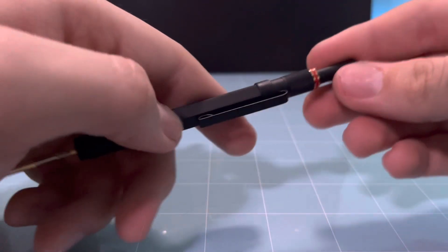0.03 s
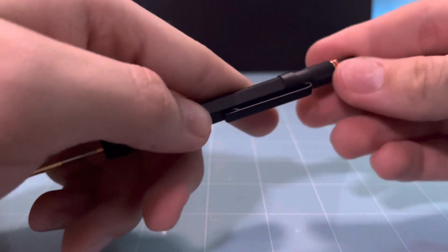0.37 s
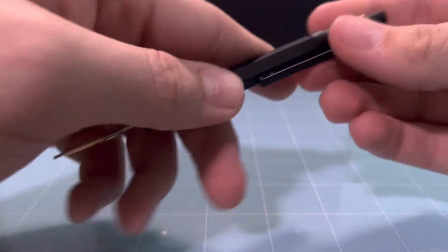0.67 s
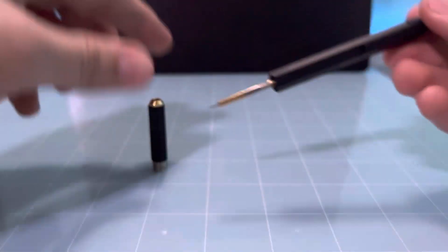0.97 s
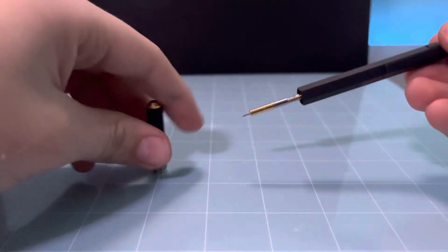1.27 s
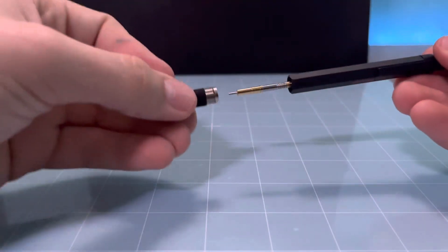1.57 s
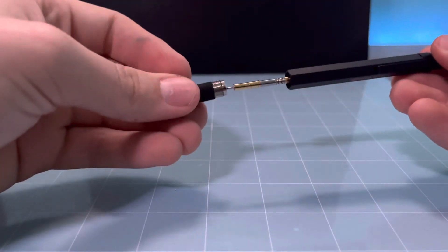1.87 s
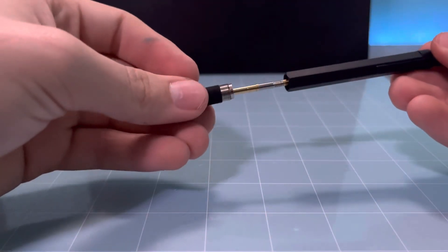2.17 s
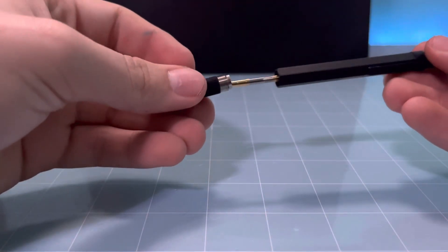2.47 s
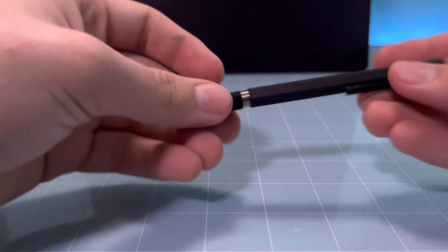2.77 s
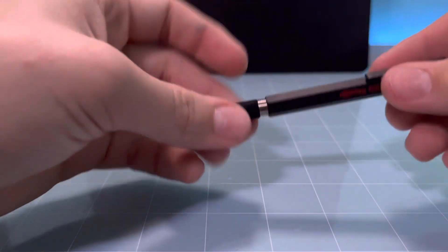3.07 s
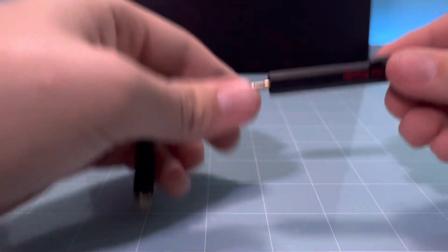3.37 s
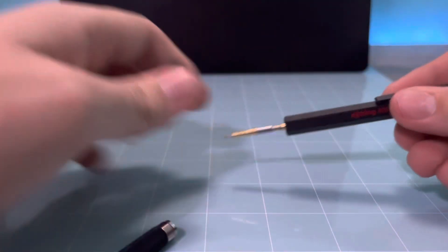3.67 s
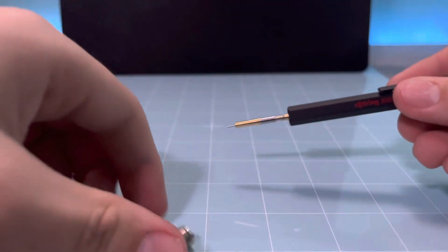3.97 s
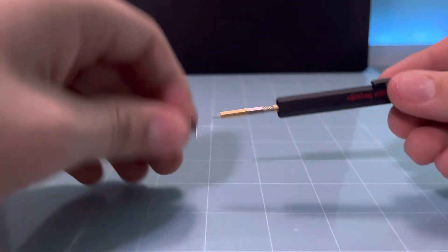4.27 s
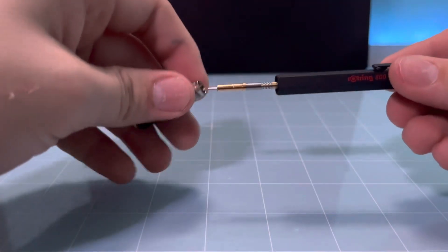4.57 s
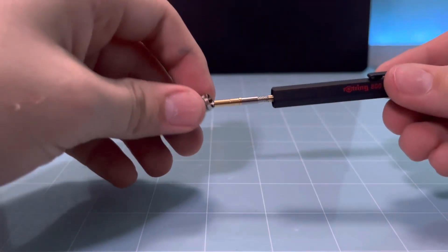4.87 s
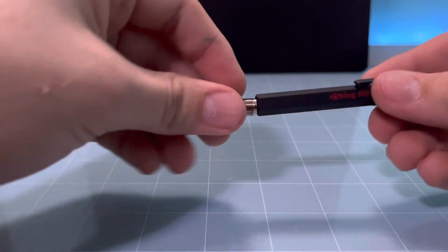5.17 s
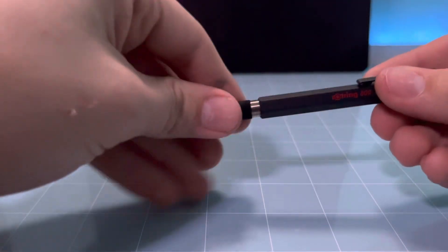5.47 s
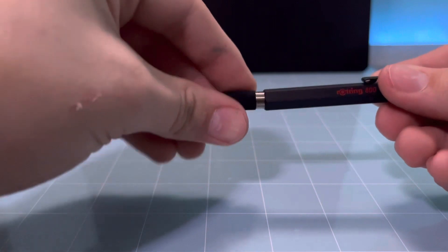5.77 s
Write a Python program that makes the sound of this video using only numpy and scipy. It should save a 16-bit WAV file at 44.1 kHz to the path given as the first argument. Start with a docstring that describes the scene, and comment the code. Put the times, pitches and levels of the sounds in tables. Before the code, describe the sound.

Light metallic clicks and short scrapes of a mechanical pencil being assembled, interrupted by its grip clattering onto a desk in a quiet room.

```python
"""At a desk in a small, quiet room, a metal mechanical pencil is fitted together by hand, close to a
small stereo microphone. Its parts tick as they touch, scrape as they slide or turn, and click home.
The grip slips off and bounces, making the desk ring, then is dragged off the desk mat and picked up.
Behind it all are a low hum, a deep rumble that comes and goes, and a soft band of hiss."""
import sys
import numpy as np
from scipy import signal
from scipy.fft import rfft, irfft, next_fast_len
from scipy.io import wavfile
from scipy.ndimage import uniform_filter1d

SR = 44100
rng = np.random.default_rng(int(sys.argv[2]) if len(sys.argv) > 2 else 0)


def to_wav(sig):
    """Store sig (one row per channel, or 1-D mono) as 16-bit WAV at the path in sys.argv[1].

    Samples outside -1..1 are clipped; the rate is SR.
    """
    pcm = np.clip(np.atleast_2d(sig), -1, 1) * 32767
    pcm = np.round(pcm).astype(np.int16)
    wavfile.write(sys.argv[1], SR, pcm.T)  # frames by channels


N = 257103
TIME = np.arange(N) / SR
TAPS = 4096  # filter length in samples
HZ = np.fft.rfftfreq(TAPS, 1 / SR)  # a "colour" is one gain for each of these frequencies

# The tone of the pencil's hollow body. Each row: frequency in Hz, relative level in dB.
HOLLOW_BODY = [(40, -13.5), (80, -3.5), (160, -1.5), (350, -4.5), (620, 1.5), (1300, 0.5), (2200, -6.5),
               (4000, -26), (16000, -59.5)]
# The murmur of the desk when its mat is rubbed. Each row: frequency in Hz, relative level in dB.
DESK_MURMUR = [(30, -23), (65, 10.5), (160, -10), (260, 2.5), (380, -4), (480, -20), (630, 1), (850, -24),
               (1200, -23), (2500, -53), (16000, -80)]


def ticks(usual_db=-40.5, usual_body_db=-74, body_slope=0.16):
    """Loose parts tap. The hollow body grows only slowly with force, so light taps are duller."""
    # Each row: start in seconds, level in dB, bright edge in dB relative to that level, ring in Hz.
    taps = [(0.2803, -38.5, -9.5, 3573), (0.517, -59, -34, 3800), (0.531, -41, -25, 4240),
            (1.276, -59, -32, 5900), (2.0175, -47.5, -21, 5184), (2.2132, -54.5, -15.5, 3300),
            (2.4002, -41, -8, 4630), (2.5253, -48, -5.5, 3180), (2.5503, -39.5, -19, 4260),
            (2.6388, -36, -32.5, 4530), (3.1602, -43, -16.5, 3170), (3.243, -41.5, -10.5, 4400),
            (3.2604, -43.5, -6.5, 3710), (3.2733, -34.5, -13, 3800), (3.3388, -56, -13.5, 3676),
            (4.002, -56, -7, 6600), (4.553, -48, -28, 4047), (4.8075, -38.5, -19.5, 4860),
            (4.8462, -36.5, -19.5, 5150), (4.9504, -31, -11, 6380), (5.035, -39.5, -15, 4150),
            (5.0514, -43.5, -20.5, 4800), (5.0658, -32.5, -18.5, 4770), (5.147, -42, -10.5, 4710),
            (5.2753, -51, -28, 4100), (5.299, -53, -22, 4680)]
    out = np.zeros(N)
    for start, db, edge_db, ring_hz in taps:
        body_db = usual_body_db + body_slope * (db - usual_db)
        add(out, start, click(db, body_db - db, edge_db, ring_hz, ring_db=10))
    return out


def parts_pushed_home(thud_hz=105, thud_s=0.0139, knock_hz=560, knock_s=0.0014):
    """A part hits its stop: a click, a small knock, a soft thud in the hands and a ringing grip tube."""
    # Each row: start in seconds, then five levels in dB: click, hollow body relative to the click,
    # strength of the barrel's ring, thud, grip tube.
    pushes = [(0.2999, -33.5, -34, 32, -46.5, -90), (2.6134, -23.5, -29, -15, -68, -43),
              (2.6442, -24.5, -41, 0, -66, -37.5), (5.137, -30, -34.5, -7.5, -44.5, -56.5),
              (5.4272, -40, -27, 0, -63, -64), (5.4521, -32, -21.5, 11, -44.5, -87),
              (5.8045, -41, -9, 5, -72, -80)]
    # The grip tube's notes. Each row: pitch in Hz, level in dB, seconds to fade by 60 dB.
    grip_notes = [(2155, 0.5, 0.015), (3230, -4.5, 0.046), (4700, -9, 0.073), (4900, -12, 0.12),
                  (6040, 13, 0.01), (8650, -10.5, .02), (12190, 4, 0.019), (12600, 0.5, .025)]
    out, t = np.zeros(N), TIME[:SR // 2]
    thud = np.sin(2 * np.pi * thud_hz * t) * np.exp(-t / thud_s)
    knock = amp(-2) * np.sin(2 * np.pi * knock_hz * t) * np.exp(-t / knock_s)
    for start, click_db, body_db, ring_db, thud_db, tube_db in pushes:
        tube = sum(amp(db - 60 * t / fade_s) * np.sin(2 * np.pi * hz * rng.normal(1, 0.0051) * t)
                   for hz, db, fade_s in grip_notes)
        add(out, start, click(click_db, body_db, edge_db=-19.5, ring_hz=4330, ring_db=ring_db))
        add(out, start, amp(thud_db) * (thud + knock) + amp(tube_db) * tube)
    return out


def slides():
    """The grip scrapes over the inner tube, louder or softer as the two close or part."""
    # Each row: start and end in seconds, level in dB, swell in dB per second,
    # bright edge in relative dB, ring in Hz.
    scrapes = [(0.262, 0.30, -78, -150, 7, 3500), (2.515, 2.538, -70.5, 1.5, -10.5, 3200),
               (2.555, 2.622, -59, -24.5, -11.5, 7200), (3.165, 3.283, -62, 50, -1, 3600),
               (4.958, 5.071, -57.5, -130, -0.5, 7000)]
    out = np.zeros(N)
    for start, end, db, swell, edge_db, ring_hz in scrapes:
        tube = metal(ring_hz, body_db=-29, edge_db=edge_db, ring_db=5, ring_octaves=0.46)
        colour = np.hypot(tube, whistle(-21.5))
        add(out, *stroke(start, end, db, colour, catch_db=2, swell_db_per_s=swell))
    return out


def turns():
    """The screw thread grinds as the grip is turned, and the hollow body sounds with it."""
    # Each row: start and end in seconds, level in dB, the thread's whistle in relative dB.
    twists = [(3.033, 3.149, -66.5, -6), (5.258, 5.307, -73, -26), (5.409, 5.447, -72.5, -12.5),
              (5.619, 5.645, -69, -14), (5.66, 5.77, -90, -8)]
    out = np.zeros(N)
    tube = metal(ring_hz=3870, body_db=-1.5, edge_db=-6, ring_db=-4.5, ring_octaves=0.28)
    for start, end, db, whistle_db in twists:
        colour = np.hypot(tube, whistle(whistle_db))
        add(out, *stroke(start, end, db, colour, catch_db=5, grain_db=7.5))
    return out


def rubs():
    """Fingers rub the barrel softly and bring out one ringing pitch."""
    # Each row: start and end in seconds, level in dB, ring in Hz.
    finger_moves = [(0.404, 0.482, -84.5, 4450), (1.225, 1.288, -85, 5900), (1.377, 1.496, -76, 4300),
                    (2.204, 2.227, -68.5, 3430), (2.271, 2.29, -80, 3360), (4.41, 4.471, -82, 4360)]
    out = np.zeros(N)
    for start, end, db, ring_hz in finger_moves:
        colour = metal(ring_hz, body_db=-9, edge_db=-37, ring_db=6, ring_octaves=0.11)
        add(out, *stroke(start, end, db, colour, catch_db=2.2))
    return out


def bounces(rise_cycles=0.37, travel_s=.0006, scatter_db=2, detune=0.033, rattle_db=-8):
    """The dropped grip bounces: each landing thumps the desk, rattles briefly and ticks."""
    # Each row: start in seconds, thump in dB, hardness as treble gain in dB per octave, tick in dB.
    landings = [(3.404, -15, -0.5, -29), (3.4496, -21, -1.5, -33), (3.4780, -19.5, 3.5, -20),
                (3.4865, -18, -2, -25.5), (3.5433, -31, 5, -29), (3.5455, -22.5, 2, -26),
                (3.5938, -24.5, -4.5, -30), (3.6216, -33, -13, -41.5), (3.6364, -40.5, -7, -48.5)]
    # The desk's notes. Each row: pitch in Hz, level in dB, seconds to fade by 60 dB.
    desk_notes = [(62, -24, 0.85), (76, -16.5, 0.1), (108, -9, 0.11), (212.4, -13.5, 0.083),
                  (241.5, -11, 0.12), (337, -13.5, 0.076), (450, -12, 0.038), (637, 0.5, 0.031),
                  (677.5, 1.5, .028), (958, -7, 0.03), (1084, -6, 0.028), (1590, -6, 0.0053),
                  (1600, -4, .022), (1786, 0, 0.02), (2420, -7, 0.026), (2806, -13, .018),
                  (3290, -13.5, 0.04), (3640, -10, 0.021), (4260, -8, 0.0098), (4970, -13.5, 0.013)]
    out = np.zeros(N)
    hz, note_db, fade_s = np.transpose(desk_notes)
    t = np.maximum(TIME[:SR, None] - travel_s * 700 / hz, 0)  # slow, low bending waves arrive last
    swell = 1 - np.exp(-(t * hz / rise_cycles) ** 2)
    rattle_colour = shape(HOLLOW_BODY) * HZ / np.hypot(HZ, 250)  # thinned below 250 Hz
    tick_colour = metal(ring_hz=6530, body_db=-6.5, edge_db=-7, barrel_db=-8.5)
    tick_colour *= treble_cut(10800)  # the soft mat dulls the top
    for start, thump_db, hardness, tick_db in landings:
        phase, strength, shift = rng.standard_normal((3, len(hz)))  # each spot rings its own way
        level = note_db + hardness * np.log2(np.maximum(hz, 700) / 700) + scatter_db * strength
        cycles = hz * (1 + detune * shift) * t + 0.26 * phase
        notes = amp(level - 60 * t / fade_s) * swell * np.sin(2 * np.pi * cycles)
        add(out, start, amp(thump_db) * notes.sum(1))
        rattle = contact(crack_s=.0022, ring_s=0.0096, ring_db=-19)
        add(out, start, amp(thump_db + rattle_db) * coloured(rattle, rattle_colour))
        tick = contact(crack_s=.0007, ring_s=0.00082, ring_db=-21)
        add(out, start, amp(tick_db) * coloured(tick, tick_colour))
    return out


def pickup(start_s=4.0, end_s=4.155, rise_s=0.04, hold_s=0.057, lift_s=.015):
    """Fingers drag the grip off the mat: skin hisses, and the desk murmurs until the weight is off."""
    # The hiss of skin. Each row: frequency in Hz, relative level in dB.
    skin = [(100, -38), (2800, -27.5), (4000, -14.5), (5500, -12.5), (7800, -4), (10000, -10), (13000, -17),
            (16000, -48)]
    t = TIME - start_s
    touch = np.clip(1 + t / rise_s, 0, 1) ** 2 * np.clip((end_s - TIME) / lift_s, 0, 1)
    murmur = drag(N) * touch * amp(-44 - 330 * np.maximum(t - hold_s, 0))  # falls 330 dB a second
    hiss = drag(N) * touch * amp(-56 - 115 * np.maximum(t, 0))
    murmur_colour = shape(DESK_MURMUR) * HZ / np.hypot(HZ, 130)  # thinned below 130 Hz
    return (coloured(murmur, murmur_colour) + coloured(hiss, shape(skin)))[:N]


def brushes():
    """A hand brushes over the mat and the desk murmurs."""
    # Each row: start and end in seconds, level in dB.
    hand_moves = [(0.848, 0.965, -74), (1.218, 1.27, -67.5), (1.852, 1.93, -70), (3.865, 3.923, -67)]
    out = np.zeros(N)
    for start, end, db in hand_moves:
        count = round((end - start) * SR)
        friction = drag(count) * signal.windows.tukey(count, .7)
        add(out, start, amp(db) * coloured(friction, shape(DESK_MURMUR)))
    return out


def click(db, body_db, edge_db, ring_hz, ring_db):
    """Two pencil parts tap together; the desk just below echoes the tap at once."""
    blow = contact(crack_s=.0007, ring_s=.003, ring_db=-18)
    echo_s = 0.00074 * 2 ** rng.uniform(-.5, .5)
    desk_echo = abs(1 + .45 * np.exp(2j * np.pi * HZ * echo_s))
    colour = metal(ring_hz, body_db, edge_db, barrel_db=-17, ring_db=ring_db, ring_octaves=.22)
    return amp(db) * coloured(blow, colour * desk_echo * treble_cut(14500))


def contact(crack_s, ring_s, ring_db):
    """One blow: a burst of tiny collisions with a short, fading tail."""
    t = TIME[:TAPS // 2]
    burst = rng.standard_normal(len(t)) * (np.exp(-t / crack_s) + amp(ring_db) * np.exp(-t / ring_s))
    band_power = uniform_filter1d(abs(rfft(burst, TAPS)) ** 2, size=161)
    flat = coloured(burst, 1 / np.sqrt(band_power))  # a hard blow drives all broad bands alike
    return flat[:len(t)] * np.sqrt(SR / 100)  # as much energy as 10 ms at level one


def stroke(start, end, db, colour, catch_db, swell_db_per_s=0, grain_db=4, fade_s=0.021):
    """One scrape: fine grains that clump where the surfaces catch. Returns its start and its sound."""
    t = start - fade_s / 2 + TIME[:round((end - start + fade_s) * SR)]
    size, noise = rng.standard_normal((2, N))[:, :len(t)]
    grains = evened(noise * amp(grain_db * size + catch_db * drift(150, len(t))))
    fade = np.minimum(np.minimum(t - t[0], t[-1] - t) / fade_s, 1)
    pressure = amp(db + swell_db_per_s * (t - (start + end) / 2)) * np.sqrt(fade)
    return t[0], coloured(grains * pressure, colour * treble_cut(13600, steepness=20))


def drag(count, lumpy_db=3, lump_hz=70):
    """Lumpy friction on the desk mat: noise with a quickly wobbling level."""
    return evened(rng.standard_normal(N)[:count] * amp(lumpy_db * drift(lump_hz, count)))


def metal(ring_hz, body_db, edge_db, barrel_db=0, ring_db=4, ring_octaves=0.18):
    """The pencil's colour: a barrel with one stronger ring, a hollow body and a bright contact edge."""
    # The tones of barrel and edge. Each row: frequency in Hz, relative level in dB.
    barrel_tone = [(100, -40), (900, -27.5), (1800, -9), (3000, -2.5), (5000, -0.5), (7500, -1.5),
                   (10000, -13), (16000, -33.5)]
    edge_tone = [(100, -61.5), (3000, -27), (6000, -3), (8000, 5), (10500, -1), (12800, -12.5),
                 (14000, -17), (16000, -16)]
    barrel = amp(barrel_db) * evened(shape(barrel_tone) * (1 + amp(ring_db) * peak(ring_hz, ring_octaves)))
    body = amp(body_db) * shape(HOLLOW_BODY)
    edge = amp(edge_db) * shape(edge_tone)
    return np.linalg.norm([barrel, body, edge], axis=0)


def whistle(db):
    """The colour of the thread's thin whistle."""
    return amp(db) * evened(peak(hz=12500, octaves=.045))


def room(x, wet_db, near_db, gap_s=.005, near_s=0.0019):
    """Quick echoes off hands and desk, then the small room's tail, each band dying at its own speed."""
    # How long the tail lasts. Each row: frequency in Hz, seconds to fade by 60 dB.
    fade_times = [(100, 1), (300, 0.4), (700, 0.12), (1500, 0.1467), (4000, 0.29), (8000, 0.21),
                  (14000, 0.37)]
    # How strong the tail is. Each row: frequency in Hz, relative level in dB.
    tail_levels = [(100, -10.5), (300, 1.5), (700, -6), (1700, -1.5), (4000, -7), (5500, -11), (7500, -14),
                   (11000, -16), (14000, -19)]
    reflections = diffuse(rng.standard_normal((2, SR)) * (rng.random((2, SR)) < .12))
    hz, t, bands = signal.stft(evened(reflections), SR, nperseg=256)
    fade_s = read(fade_times, hz)[:, None]
    same_energy = np.sqrt(2 * np.log(1000) / fade_s / SR)  # for long and short tails alike
    bands *= amp(read(tail_levels, hz)[:, None] - 60 * t / fade_s) * same_energy
    age = TIME[:SR]
    tail = signal.istft(bands, SR, nperseg=256)[1][:, :SR] * (1 - np.exp(-(age / gap_s) ** 2))
    near = diffuse(rng.standard_normal((2, SR))) * age * np.exp(-age / near_s)
    echoes = amp(wet_db) * tail + amp(near_db) * near / np.linalg.norm(near[0])
    return x + signal.fftconvolve(x[None], echoes, axes=1)[:, :N]


def microphone(pair, phase, balance):
    """Sound from one spot reaches the microphone's two sides with different delay and strength."""
    hz = np.fft.rfftfreq(N, 1 / SR)
    left = amp(read(balance, hz) / 2) * np.exp(1j * read(phase, hz) / 2)
    return irfft(rfft(pair) * np.array([left, 1 / left]), N)


def background(rumble_hz=42, rumble_width_hz=9, hum_rise_s=0.18):
    """Steady room air, a deep rumble that comes and goes, and a few wavering hums."""
    # The air's hiss. Each row: frequency in Hz, level in dB per Hz.
    air_tone = [(20, -108), (32, -90), (60, -82.5), (88, -86), (130, -90), (200, -103), (255, -102.5),
                (295, -90.5), (330, -106), (480, -111), (680, -110), (900, -116), (1150, -111), (1700, -98),
                (2150, -103), (2600, -121), (3100, -126), (5000, -127), (9000, -135), (16000, -146)]
    # The rumble's course. Each row: time in seconds, level in dB.
    rumble_levels = [(0, -67.5), (1.1, -58.5), (1.9, -56), (2.15, -74.5), (3, -75), (5.83, -50)]
    # Each row: time in seconds when the hum is fully on, pitch in Hz, level in dB.
    hums = [(0, 55.4, -60), (0, 250, -80), (4.3, 690, -89)]
    air_gain = amp(read(air_tone, np.fft.rfftfreq(N, 1 / SR))) * np.sqrt(SR / 2)
    air = irfft(rfft(diffuse(rng.standard_normal((2, N)))) * air_gain, N)
    angle = 2 * np.pi * rumble_hz * TIME
    rumble = evened(drift(rumble_width_hz) * np.sin(angle) + drift(rumble_width_hz) * np.cos(angle))
    out = air + rumble * amp(np.interp(TIME, *np.transpose(rumble_levels)))
    for on_s, hz, db in hums:
        tone = np.sin(2 * np.pi * (hz * TIME + .1 * drift(6)))
        hum = evened(tone * amp(1.2 * drift(4)))
        out += amp(db) * hum * np.clip(1 + (TIME - on_s) / hum_rise_s, 0, 1)
    return out


def diffuse(pair):
    """Turns two unrelated noises into sound from all around, partly alike on the left and right."""
    # Each row: frequency in Hz, likeness of the two sides from 0 (unrelated) to 1 (the same).
    likeness = [(60, .85), (290, .65), (640, .25), (1400, 0), (3500, .2), (6500, .8), (8500, .97),
                (14000, .92)]
    count = pair.shape[1]
    left, other = rfft(pair)
    alike = read(likeness, np.fft.rfftfreq(count, 1 / SR))
    right = alike * left + np.sqrt(1 - alike ** 2) * other
    return irfft(np.array([left, right]), count)


def coloured(x, gain):
    """Filters a sound by a colour, so that nothing rings before its blow."""
    log_gain = np.log(np.maximum(np.r_[gain, gain[-2:0:-1]], gain.max() * 1e-5))
    response = np.exp(np.conj(signal.hilbert(log_gain)))[:len(gain)]
    return signal.fftconvolve(x, irfft(response))


def drift(rate_hz, count=N):
    """A smooth random wobble with a typical size of one."""
    size = next_fast_len(N, True)
    keep_slow = np.exp(-(np.fft.rfftfreq(size, 1 / SR) / rate_hz) ** 2)
    return evened(irfft(rfft(rng.standard_normal(size)) * keep_slow, size))[:count]


def peak(hz, octaves):
    """A colour with one bump of height one."""
    return 1 / (1 + (np.log2((HZ + 1) / hz) / octaves) ** 2)


def treble_cut(hz, steepness=10):
    """A colour that falls away above a frequency."""
    return 1 / np.sqrt(1 + (HZ / hz) ** steepness)


def shape(points):
    """Turns a tone table into a colour that keeps the power of white noise."""
    return evened(amp(read(points, HZ)))


def read(points, hz):
    """Reads between a table's rows, with frequency spaced in octaves."""
    row_hz, value = np.transpose(points)
    return np.interp(np.log(hz + 1), np.log(row_hz + 1), value)


def amp(db):
    """Decibels to gain."""
    return 10 ** (np.asarray(db) / 20)


def evened(x):
    """Scales to an average power of one."""
    return x / np.sqrt(np.mean(x ** 2) + 1e-30)


def add(mix, start_s, sound):
    """Mixes a sound in at a time."""
    part = mix[round(start_s * SR):][:len(sound)]
    part += sound[:len(part)]


def scene():
    """The pencil and the desk sound into the room from two spots, over its background."""
    # How each spot is heard. Each row: frequency in Hz, how far the left side leads in radians.
    pencil_phase = [(60, 0), (1500, 0), (3000, .7), (4800, .2), (5600, -1), (7000, -1.8), (8300, -3.1),
                    (9600, -4.1), (10900, -5.6), (13000, -6.7), (16000, -9.4)]
    desk_phase = [(60, 0), (700, 0), (1030, 1.1), (1300, 2.2), (1700, .8), (4800, .5), (5600, -.8),
                  (7000, -1.6), (10800, -5.5), (16000, -9)]
    # Each row: frequency in Hz, left level minus right level in dB.
    pencil_balance = [(60, -.5), (700, -.8), (1500, -1.5), (2800, 5), (4400, 3), (8000, .5), (15000, 0)]
    desk_balance = [(60, -2), (130, -2.5), (290, -1), (640, 1), (1410, -3), (3100, 5), (6820, 1.5),
                    (15000, -1)]
    pencil = room(ticks() + parts_pushed_home() + slides() + turns() + rubs(), wet_db=-3.5, near_db=-10.5)
    desk = room(bounces() + brushes() + pickup(), wet_db=-3, near_db=-13)
    pencil = microphone(pencil, pencil_phase, pencil_balance)
    desk = microphone(desk, desk_phase, desk_balance)
    return pencil + desk + background()


def record(dry):
    """Cuts away the highest treble, above 16400 Hz."""
    low_pass = signal.firwin(511, 16400, window=("kaiser", 9), fs=SR)
    return signal.oaconvolve(dry, low_pass[None], "same")


dry = scene()
out = record(dry)
to_wav(out)
```